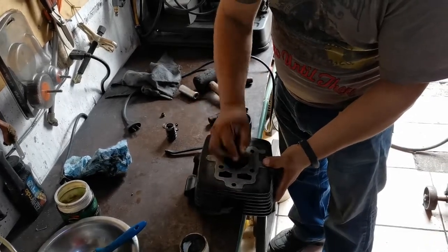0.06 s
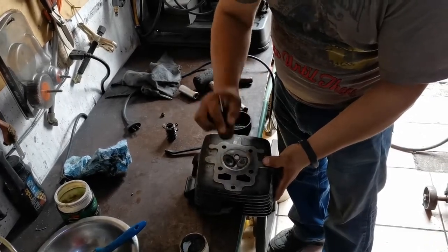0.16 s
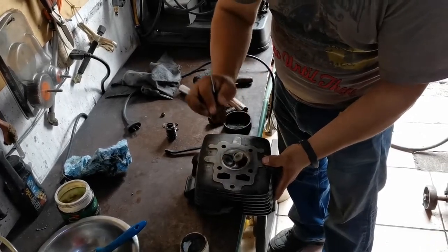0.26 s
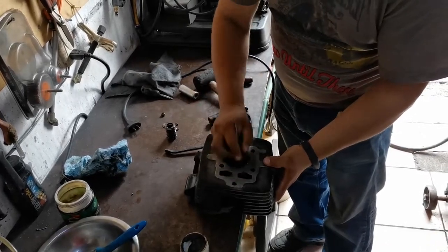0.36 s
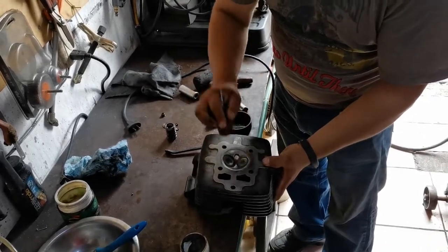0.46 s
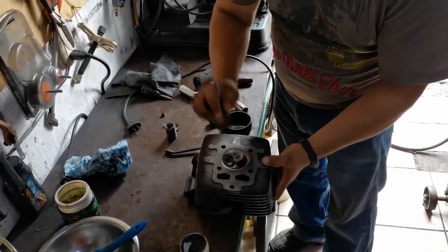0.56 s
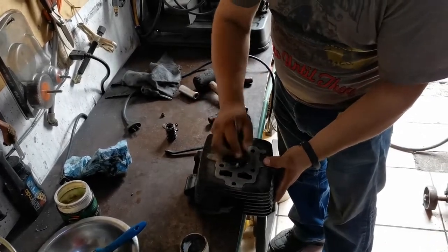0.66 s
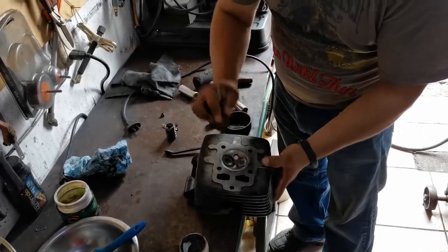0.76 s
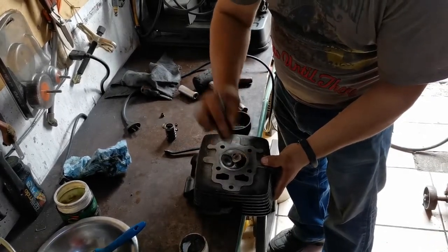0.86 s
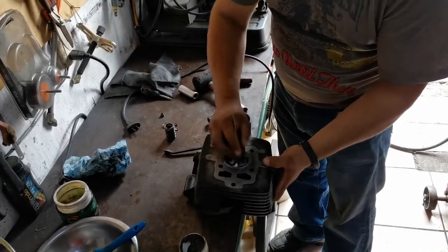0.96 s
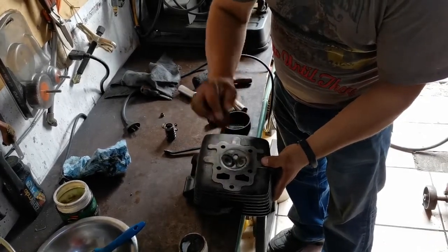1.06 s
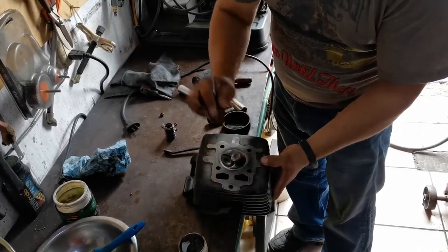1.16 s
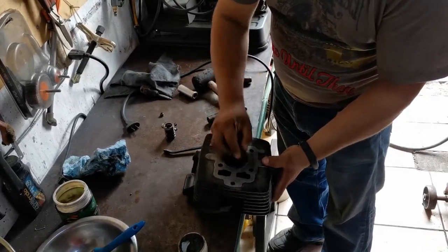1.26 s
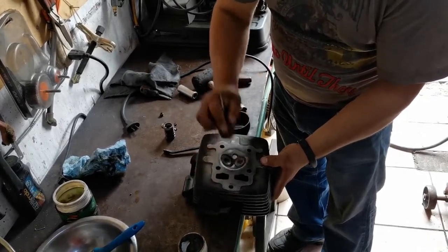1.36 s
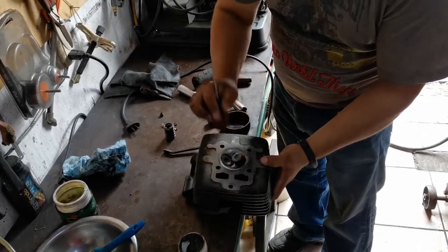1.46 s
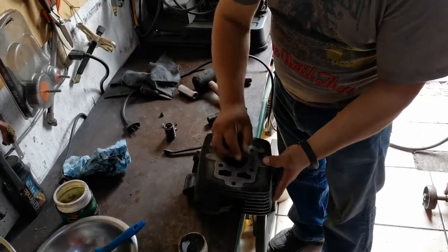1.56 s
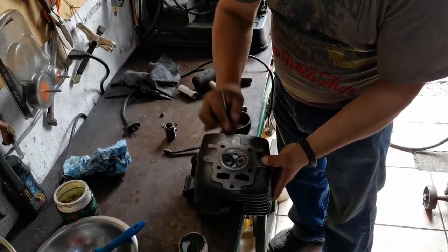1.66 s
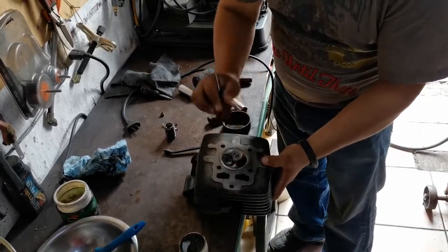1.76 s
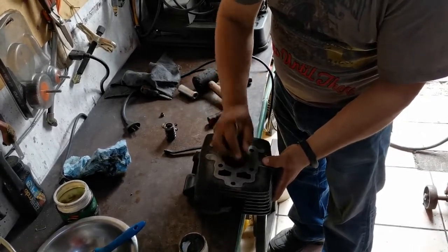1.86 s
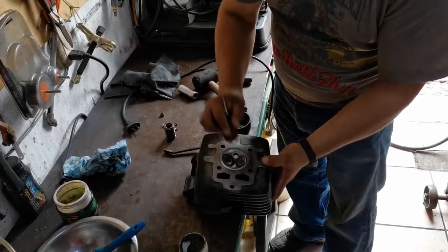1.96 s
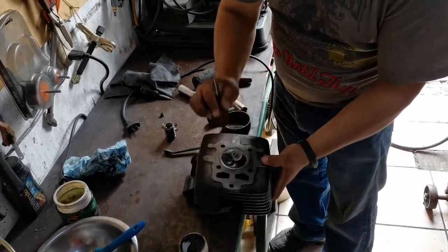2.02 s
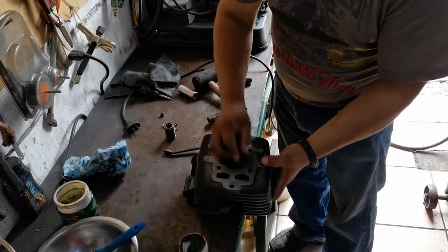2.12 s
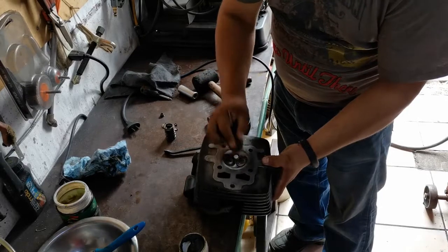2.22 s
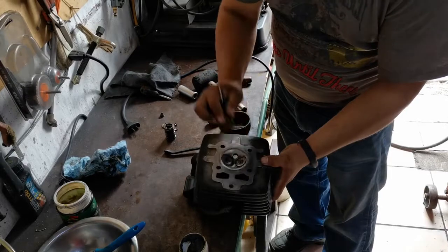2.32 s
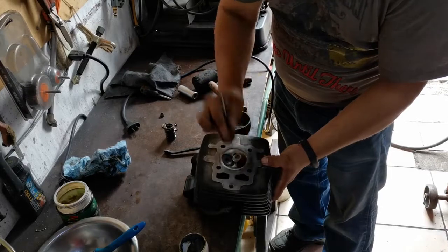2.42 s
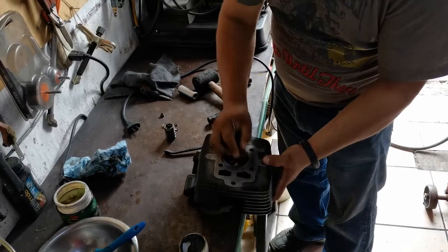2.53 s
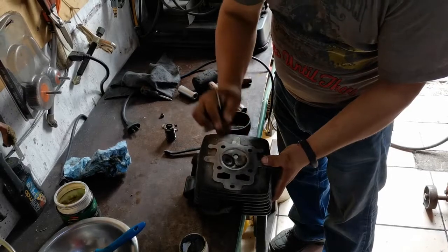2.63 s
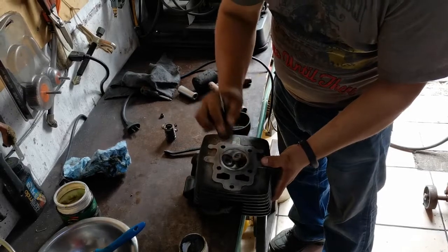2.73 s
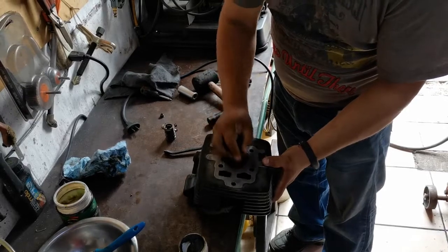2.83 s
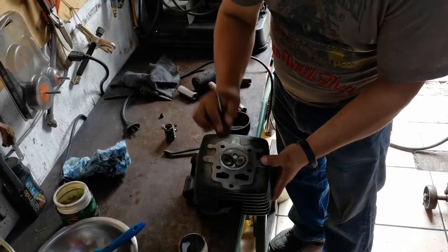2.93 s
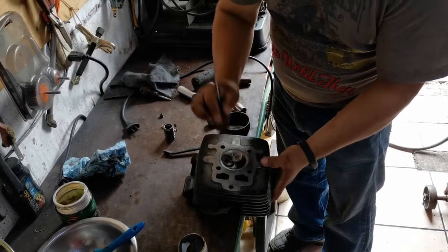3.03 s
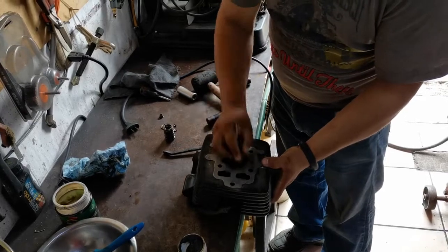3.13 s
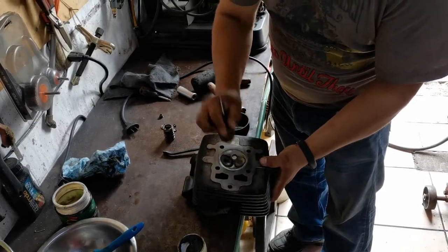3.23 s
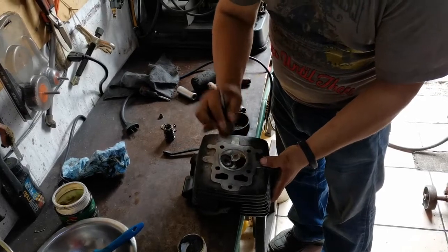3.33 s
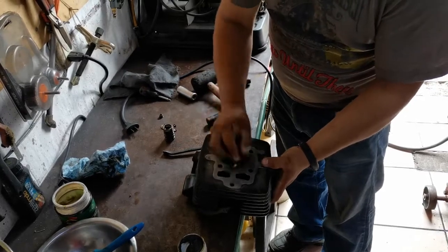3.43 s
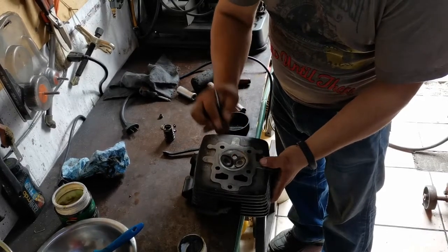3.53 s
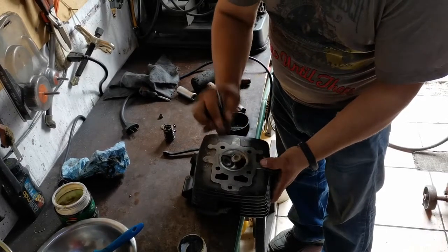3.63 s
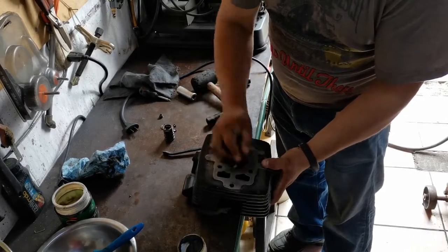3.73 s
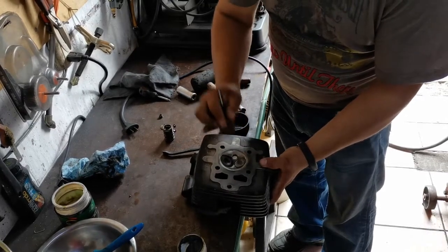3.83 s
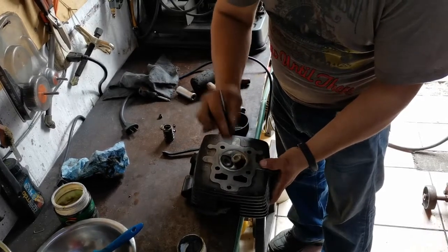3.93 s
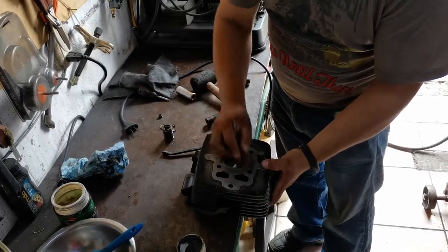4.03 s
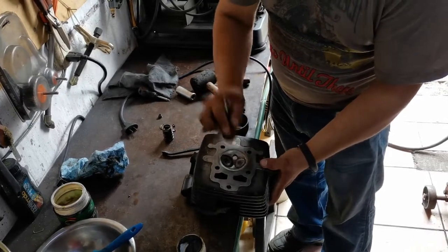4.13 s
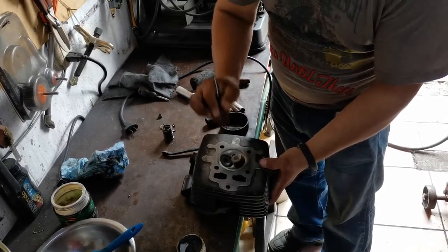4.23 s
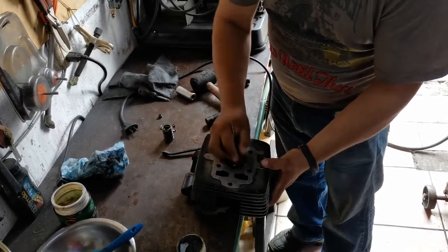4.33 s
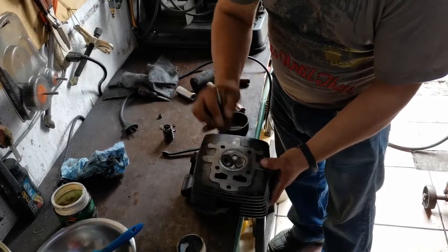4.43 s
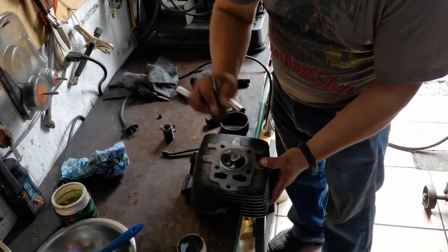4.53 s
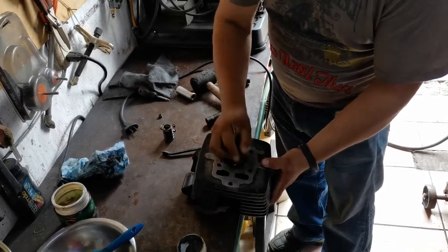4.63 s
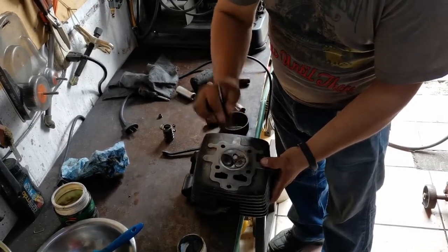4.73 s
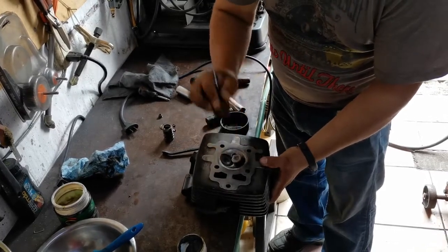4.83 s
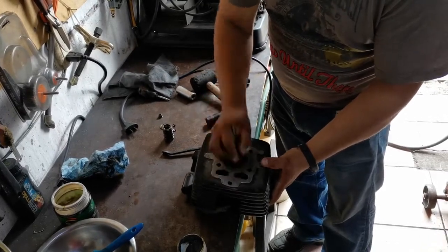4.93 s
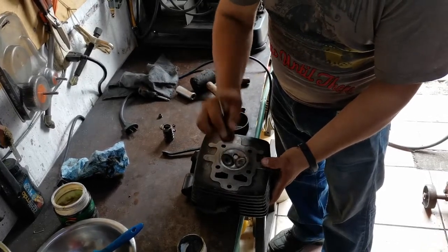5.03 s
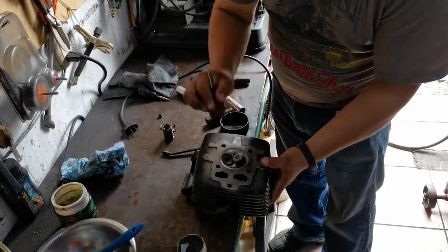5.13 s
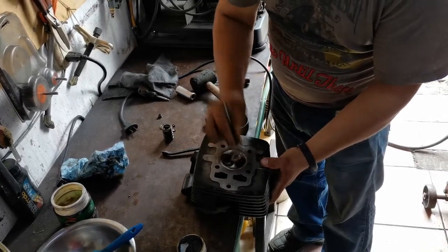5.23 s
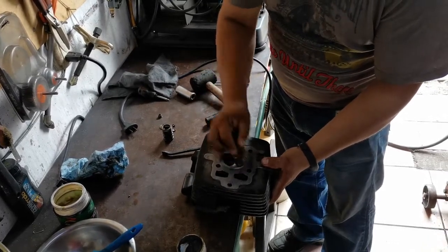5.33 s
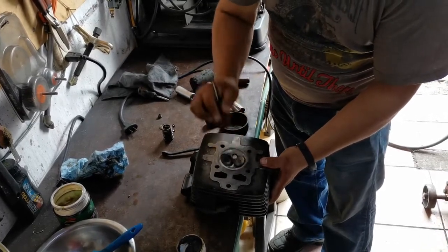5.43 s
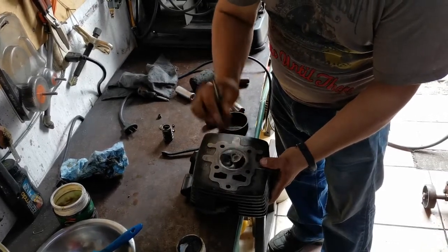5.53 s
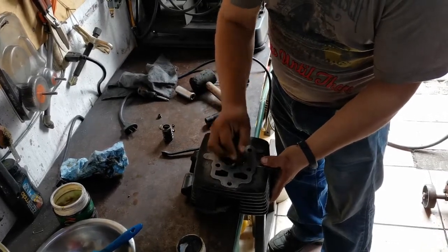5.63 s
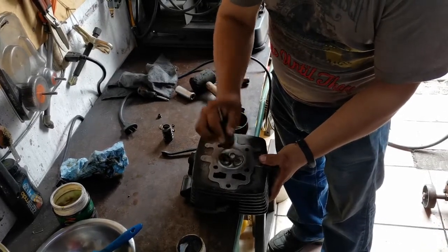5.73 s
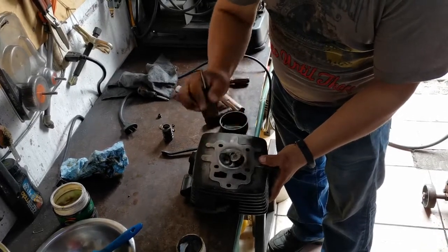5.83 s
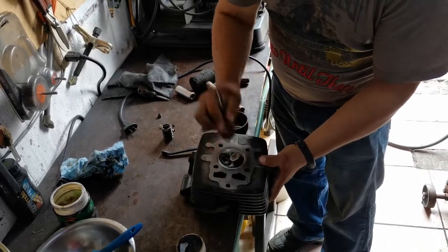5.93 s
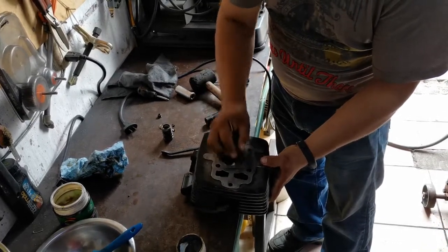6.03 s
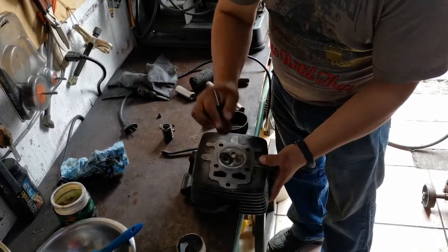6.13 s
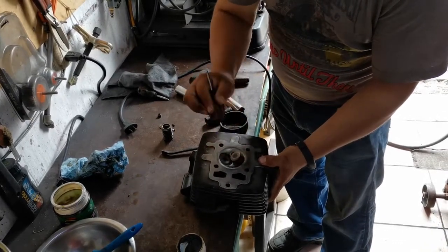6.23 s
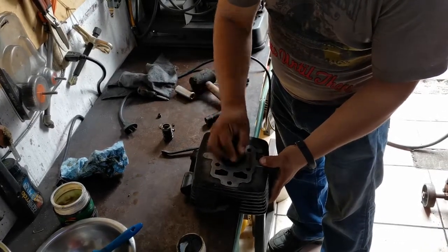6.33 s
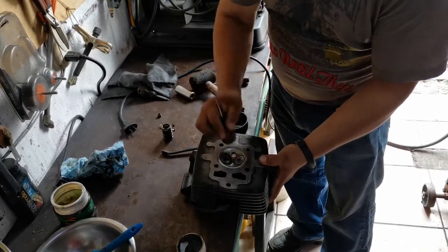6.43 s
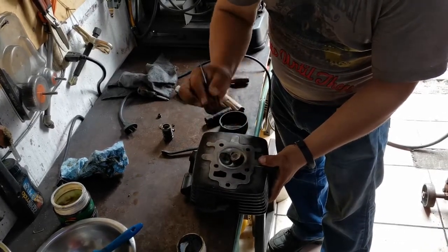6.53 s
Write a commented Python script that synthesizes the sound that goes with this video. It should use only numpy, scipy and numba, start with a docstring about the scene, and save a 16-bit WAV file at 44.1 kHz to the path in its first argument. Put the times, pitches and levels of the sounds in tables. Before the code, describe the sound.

A steel valve is bounced on its seat in a cylinder head, making sharp, briefly ringing taps about three times a second throughout. Some taps are followed by a soft, short hiss as the valve lifts. The workshop is open to the street, with low traffic rumble, a faint idling engine and machine hum. Two faint distant toots pass just after the middle. A nearby phone microphone lets the rumble swell between taps.

```python
"""Ringing metal taps, about three a second, over street rumble and a faint machine hum.
A steel valve is bounced on its seat in a finned cylinder head, in a workshop open to the street.
Each stroke: the rim touches, the face lands some 7 ms later; some lift-offs hiss. Two far toots pass.
A phone listens through two unlike ports and raises its gain between taps, so the rumble swells there."""
import sys
import numpy as np
from scipy import signal
from scipy.fft import rfft, irfft, next_fast_len
from scipy.io import wavfile
from scipy.ndimage import uniform_filter1d, map_coordinates
from numba import njit

SR = 44100
rng = np.random.default_rng(int(sys.argv[2]) if len(sys.argv) > 2 else 0)


def inscribe(sig):
    """Save sig as 16-bit PCM at rate SR to the path in sys.argv[1].

    A 1-D sig is mono; a 2-D sig holds one channel per row.
    Samples are clipped to [-1, 1] before scaling.
    """
    pcm = np.round(np.clip(np.atleast_2d(sig).T, -1, 1) * 32767)
    wavfile.write(sys.argv[1], SR, pcm.astype(np.int16))


N = 289737


def amp(db):
    return 10 ** (np.asarray(db) / 20)


def unit_rms(x):
    return x / np.sqrt(np.mean(x ** 2) + 1e-20)


def at_hz(points, hz):
    """Interpolate (f/Hz, value) points on a log axis."""
    f, value = np.transpose(points)
    return np.interp(np.log(hz + 1), np.log(f + 1), value)


def wobble(rate_hz):
    """Smooth random curve, rate_hz knots a second."""
    knots = rng.standard_normal(int(N * rate_hz / SR) + 4)
    return map_coordinates(knots, [np.arange(N) * rate_hz / SR])


def phase_drift(shape, step_rad):
    """Random walk that keeps a long ring from sounding glassy."""
    return np.cumsum(step_rad * rng.standard_normal(shape), axis=-1)


def filtered(x, response):
    """Apply a response given as a function of f/Hz."""
    n = x.shape[-1]
    size = next_fast_len(n + SR // 10)
    return irfft(rfft(x, size) * response(np.fft.rfftfreq(size, 1 / SR)), size)[..., :n]


def burst(spectrum, db, t60_s, t):
    """Decaying coloured noise."""
    noise = filtered(rng.standard_normal(len(t)), lambda f: amp(at_hz(spectrum, f)))
    return amp(db - 60 * t / t60_s) * unit_rms(noise)


def mix_in(track, start_s, sound):
    """Add a stereo sound; start_s may be negative."""
    k = round(start_s * SR)
    sound = sound[:, max(-k, 0):N - k]
    track[:, max(k, 0):max(k, 0) + sound.shape[1]] += sound


def contact(zone_db, favour_db, free_s, damping_db_per_s, crack_db):
    """A blow rings each mode at its zone's level, with a short crack and the shimmer of the fins."""
    # edges between the low, middle, upper, high and top zones: f/Hz
    zone_edges = [2000, 3600, 5600, 9000]
    # modes of head and valve: f/Hz, level/dB, t60/s
    modes = [(1280, -25, 0.021), (1300, -30, 0.29), (1437, -6, 0.027), (1598, -20, .025),
             (1828, -21, 0.052), (2115, -15, 0.046), (2279, -4, 0.026), (2662, -7.5, 0.02),
             (2819, -6, 0.021), (3245, -9, 0.017), (3794, -3, 0.01), (4390, -25.5, 0.25),
             (4329, -4.5, 0.038), (4790, -4.5, 0.0094), (6590, -9, 0.093), (6870, -19, 0.19),
             (7080, 3.5, 0.01), (7693, -3, 0.05), (9440, -33, .04), (10300, -28, 0.052), (10930, -36, 0.22),
             (11030, -11.5, 0.096), (11180, -24.5, 0.036), (13000, -33, 0.047), (11780, -47, 0.084),
             (11500, -35, .16)]
    # impact noise: f/Hz, level/dB
    crack_spectrum = [(300, -78), (800, -74), (1300, 16), (3000, 22), (5000, -23), (6000, -37), (7500, 12),
                      (9000, 4), (11000, -10), (13000, -4), (16000, -37)]
    # dense fin modes: f/Hz, level/dB
    fin_spectrum = [(8500, -54.5), (9500, -23), (10300, -8.5), (11000, -9.5), (12000, -8.5), (13000, -21.5),
                    (15000, -25)]
    t = np.arange(SR // 2) / SR
    ring_t = t[:SR // 4]
    hz, db, t60_s = np.transpose(modes)[:, :, None]
    scatter_db = rng.normal(0, 2.5, hz.shape)
    level_db = db + np.asarray(zone_db)[np.searchsorted(zone_edges, hz)] + favour_db(hz) + scatter_db
    held_s = (t60_s < .1) * np.maximum(ring_t - free_s, 0)  # contact damps only the short modes
    decay_db = 60 * ring_t / t60_s + damping_db_per_s * held_s
    phase = 2 * np.pi * hz * ring_t + phase_drift(decay_db.shape, .03)
    ring = np.sum(amp(level_db - decay_db) * np.sin(phase), axis=0)
    crack = burst(crack_spectrum, np.mean(zone_db) + crack_db, .005, t)
    shimmer = burst(fin_spectrum, zone_db[-1] - 9.5, .17, t)
    attack = 1 - np.exp(-t / .0002)
    return (np.pad(ring, (0, len(t) - len(ring_t))) + crack + shimmer) * attack


def workshop(direct, wet_db, early_db, indirect=0):
    """Direct sound plus a fresh tail per port: bench and near walls first, then the slow decay."""
    # room decay: f/Hz, t60/s
    reverb_times = [(300, 0.26), (800, 0.32), (1500, 0.33), (4000, 0.31), (11000, 0.3), (15000, 0.085)]
    hz, t, noise = signal.stft(rng.standard_normal((2, SR // 2)), SR, nperseg=128)
    late = amp(-60 * t / at_hz(reverb_times, hz)[:, None])
    early = amp(early_db - 60 * t / .012)
    tail = signal.istft(noise * (late + early), SR, nperseg=128)[1]
    tail = np.pad(tail / np.linalg.norm(tail[0]), ((0, 0), (round(.002 * SR), 0)))
    send = amp(wet_db) * direct + indirect
    return direct + signal.fftconvolve(send[None], tail, axes=1)[:, :len(direct)]


def far_side(zone_db, share_db, t):
    """Hidden faces of the head send one click that reaches the ports only by the walls."""
    # click colour: f/Hz, level/dB
    spectrum = [(400, -18), (800, -21.5), (1300, 4), (2000, 2.5), (3000, 1), (4500, -4), (5700, -19.5),
                (7200, -23), (8800, -47), (11000, 3.5), (13000, -25), (15000, -60)]
    zone_spectrum = np.transpose([[1400, 2800, 4500, 7300, 11000], zone_db])
    click = (np.arange(len(t)) == SR // 500) * amp(share_db)
    return filtered(click, lambda f: amp(at_hz(spectrum, f) + .81 * at_hz(zone_spectrum, f)))


def valve_taps():
    """Rim touches ring briefly, as fingers still hold the stem; landings also thump the bench."""
    # strokes: landing t/s, rim lead/s, rim middle zone/dB,
    # landing low/dB, middle/dB, upper/dB, top/dB, bench thump/dB, stem ping/dB
    strokes = [(-0.19, .007, -24, -18, -35, -14.5, -20, -33.5, -60),
               (0.1061, 0.0068, -21.5, -14.5, -20.5, -19, -13.5, -12, -58),
               (0.4, 0.0066, -24.5, -19.5, -17, -17, -14, -14, -44),
               (0.6885, 0.0061, -24.5, -17.5, -23, -15, -16, -35, -36),
               (0.978, 0.0061, -23, -16, -27, -25, -16.5, -49, -47),
               (1.3116, .0082, -25, -26.5, -29.5, -25.5, -14, -6.5, -43.5),
               (1.612, 0.0066, -20.5, -12, -20.5, -17, -15.5, -46, -56),
               (1.9346, 0.0063, -28, -14.5, -18.5, -18.5, -14.5, -19, -41),
               (2.2363, 0.0057, -20, -21.5, -21, -16.5, -16, -14, -42),
               (2.5438, 0.0071, -27, -13.5, -24.5, -15.5, -15, -40, -40),
               (2.8577, 0.0074, -23.5, -15.5, -28.5, -16, -12.5, -38.5, -48),
               (3.1749, 0.0068, -29.5, -15, -29, -25.5, -15.5, -11, -36),
               (3.4712, .0073, -19.5, -14.5, -23, -14.5, -13.5, -32, -45),
               (3.7738, .0069, -21, -18, -25.5, -16.5, -13.5, -14, -41.5),
               (4.0767, .0069, -22.5, -12.5, -19.5, -20, -13, 6.5, -38),
               (4.3696, 0.0055, -28, -16, -30.5, -16.5, -13.5, -38, -43),
               (4.673, .0075, -19, -14, -20.5, -18.5, -14.5, -35, -45),
               (4.9906, .0066, -20.5, -13.5, -22, -18, -14, -18, -56),
               (5.3496, .0080, -19.5, -14, -23.5, -23, -10, -15, -60),
               (5.683, 0.0074, -21.5, -15, -24.5, -24, -14, -12, -57),
               (6.0443, 0.0064, -34, -7.5, -19, -20, -14.5, -40, -54),
               (6.3929, 0.0081, -24.5, -18.5, -14, -29.5, -14.5, -6, -58)]
    # stem mode, strong on only some landings: f/Hz, t60/s
    stem_mode = (3385, 0.26)
    ping_hz, ping_t60_s = stem_mode
    out, t = np.zeros((2, N)), np.arange(SR // 2) / SR
    rim_favour_db = lambda hz: 7 * np.exp(-((hz - 2780) / 230) ** 2) - 6
    for land_s, lead_s, rim_db, *lower_db, top_db, thump_db, ping_db in strokes:
        rim_low_db, rim_top_db, high_db = rng.normal([-24.5, -22.5, -28.5], 1.5)
        rim_zone_db = [rim_low_db, rim_db, rim_db - 11, rim_db - 11, rim_top_db]
        rim = contact(rim_zone_db, rim_favour_db, free_s=.0025, damping_db_per_s=18000, crack_db=-5)
        mix_in(out, land_s - lead_s, workshop(rim, wet_db=-4, early_db=3))

        zone_db = [*lower_db, high_db, top_db]
        thump = amp(thump_db) * np.sin(2 * np.pi * 450 * t) * np.exp(-t / .00011)
        ping_phase = 2 * np.pi * ping_hz * t + phase_drift(len(t), .059)
        ping = amp(ping_db - 60 * t / ping_t60_s) * np.sin(ping_phase)
        face = contact(zone_db, np.zeros_like, free_s=.0026, damping_db_per_s=3300, crack_db=4.5)
        click = far_side(zone_db, share_db=20.5, t=t)
        mix_in(out, land_s, workshop(face + thump + ping, wet_db=-3.5, early_db=-1, indirect=click))
    return out


def traffic():
    """Lumpy street noise, alike at both ports in the bass, diffuse in the treble."""
    # noise density: f/Hz, level/dB
    spectrum = [(15, -47), (25, -6), (86, -2), (565, -22.5), (620, -18), (958, -18.5), (1050, -37),
                (1290, -20.5), (1380, -29.5), (2510, -28.5), (3620, -42), (4160, -34), (6000, -49),
                (7800, -58), (13200, -120)]
    # left-right likeness: f/Hz, correlation
    coherence = [(28, 0.95), (60, 1), (140, 0.93), (250, 0.93), (500, 0.92), (1200, .1), (9000, .05)]
    # slow swell: t/s, level/dB
    swell = [(0, -61), (.8, -62.5), (1.5, -63), (3.7, -60), (4.7, -57.5), (5.3, -60.5), (6, -58),
             (6.57, -59.5)]
    width_rad = lambda f: np.arccos(np.clip(at_hz(coherence, f), -1, 1)) / 2
    response = lambda f: amp(at_hz(spectrum, f)) * [np.cos(width_rad(f)), np.sin(width_rad(f))]
    mid, side = filtered(rng.standard_normal((2, N)), response)
    level_db = np.interp(np.arange(N) / SR, *np.transpose(swell)) + 1.6 * wobble(9)
    return amp(level_db) * unit_rms(np.array([mid + side, mid - side]))


def idling_engine():
    """An unsteady firing note and its octave."""
    # firing note: t/s, level/dB
    swell = [(0, -61.5), (.3, -43), (.6, -61.5), (.95, -49.5), (1.1, -54.5), (1.27, -51), (1.45, -68),
             (1.9, -61.5), (3.1, -71), (4.5, -59), (5, -80), (6.57, -81)]
    firing_hz = 83.5 * (1 + .0164 * wobble(6.5))
    phase = 2 * np.pi * np.cumsum(firing_hz) / SR
    firing_db = np.interp(np.arange(N) / SR, *np.transpose(swell)) + 2.2 * wobble(7.7)
    octave_db = -65 + 2.8 * wobble(18)
    return amp(firing_db) * np.sin(phase) + amp(octave_db) * np.sin(2 * phase)


def machine_hum():
    """Faint tones of a distant machine, each wavering in level."""
    # hum tones: f/Hz, level/dB
    tones = [(334, -76.5), (722, -73.5), (780, -71), (948, -80), (1281, -81.5)]
    out, t = np.zeros((2, N)), np.arange(N) / SR
    for hz, db in tones:
        out += amp(db + 2 * wobble(15)) * np.sin(2 * np.pi * hz * t + phase_drift((2, N), .0218))
    return out


def lift_hiss():
    """The valve face parts from the paste on its seat with a short hiss."""
    # lift-offs: t/s, level/dB
    lifts = [(0.2722, -45), (0.866, -54), (1.1322, -55), (1.1751, -53), (1.786, -49), (2.7066, -50),
             (3.024, -41), (3.947, -43), (4.559, -49), (5.2, -45), (5.638, -47), (6.2281, -53)]
    # hiss colour: f/Hz, level/dB
    spectrum = [(3000, -31), (6500, -26), (7500, -4), (8500, -35), (10500, -4), (12500, -1), (13500, -89)]
    out, t = np.zeros((2, N)), np.arange(SR // 10) / SR
    attack = 1 - np.exp(-t / .0061)
    for start_s, db in lifts:
        left = burst(spectrum, db - 8, .1, t)
        right = burst(spectrum, db, .043, t)
        mix_in(out, start_s, np.array([left, right]) * attack)
    return out


def far_toots():
    """Two faint, short tones from the street."""
    # toots: t/s, length/s, level/dB
    toots = [(3.859, 0.073, -56.5), (4.017, 0.062, -54.5)]
    out, pitch_hz = np.zeros((2, N)), 540
    for start_s, length_s, db in toots:
        t = np.arange(round(length_s * SR)) / SR
        envelope = amp(db) * np.sin(np.pi * t / length_s) ** 1.2
        mix_in(out, start_s, envelope * np.sin(2 * np.pi * pitch_hz * t) * np.ones((2, 1)))
    return out


def scene():
    """Valve, street and hum in stereo."""
    return valve_taps() + lift_hiss() + traffic() + idling_engine() + far_toots() + machine_hum()


@njit
def glide(target, fall_s, rise_s):
    """One-pole follower with separate fall and rise times."""
    out, now = np.empty(len(target)), target[0]
    for k in range(len(target)):
        now += (target[k] - now) / (SR * (fall_s if target[k] < now else rise_s))
        out[k] = now
    return out


def record(dry):
    """Each port has its colour and the left leads; the gain rises while the level is under a knee."""
    # left port response: f/Hz, gain/dB
    left_port = [(300, -4), (750, -9), (1000, -3.5), (1400, -4), (2500, -7.5), (4500, -2), (7500, -5.5),
                 (9000, 0), (11000, -0.5), (16000, -20)]
    # right port response: f/Hz, gain/dB
    right_port = [(300, -4.5), (750, -8.5), (1100, 1), (8000, 5), (9000, 9), (10000, -25.5), (12000, -26),
                  (16000, -25)]
    lead_s, cutoff_hz = .00008, 16300
    knee_db, max_boost_db = -41, 14.5
    lead = lambda f: np.exp(2j * np.pi * f * lead_s)
    ports = lambda f: np.array([amp(at_hz(left_port, f)) * lead(f), amp(at_hz(right_port, f))])
    heard = filtered(dry, ports)
    sensed = filtered(heard, lambda f: f / (f + 600))  # the level sensor is deaf to rumble
    power = np.abs(uniform_filter1d(np.mean(sensed ** 2, axis=0), size=301))
    level_db = 10 * np.log10(power + 1e-12)
    target_db = np.clip(.7 * (knee_db - level_db), 0, max_boost_db)
    boost_db = glide(target_db, fall_s=.01, rise_s=.025)
    return filtered(heard * amp(boost_db), lambda f: f < cutoff_hz)


dry = scene()
out = record(dry)
inscribe(out)
```